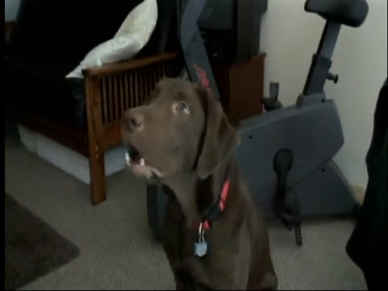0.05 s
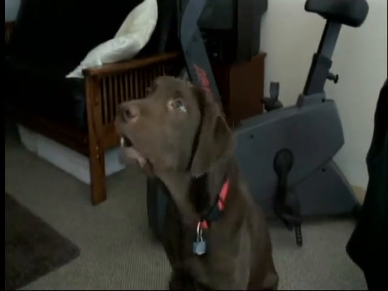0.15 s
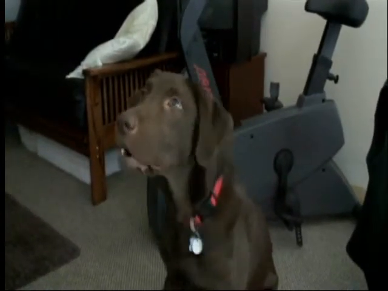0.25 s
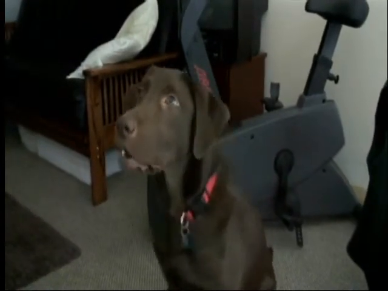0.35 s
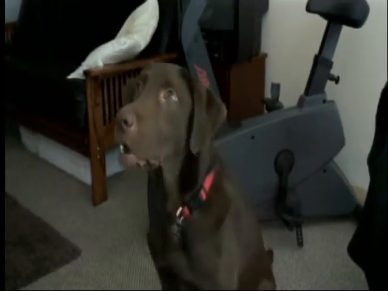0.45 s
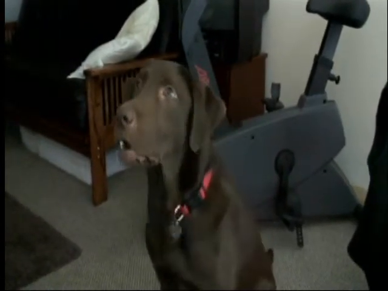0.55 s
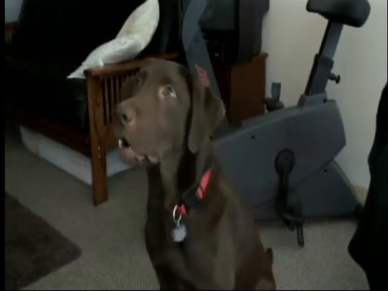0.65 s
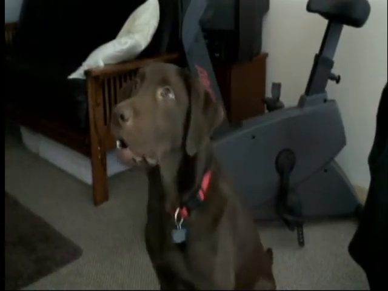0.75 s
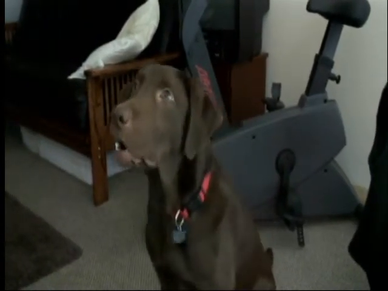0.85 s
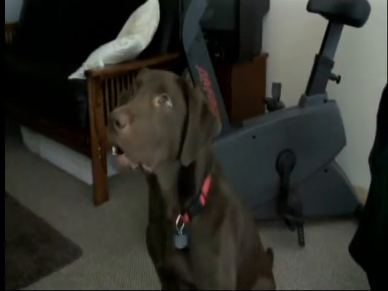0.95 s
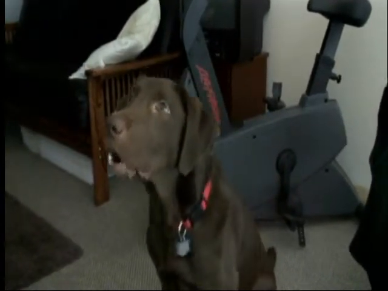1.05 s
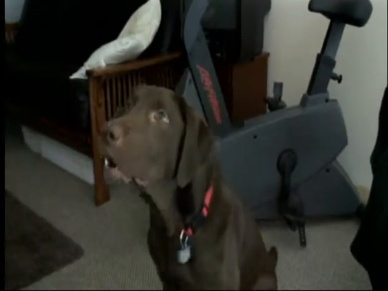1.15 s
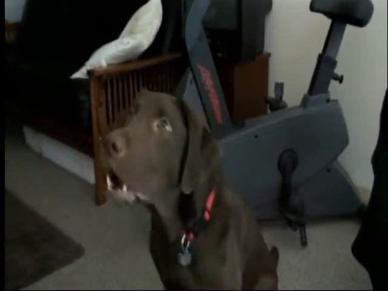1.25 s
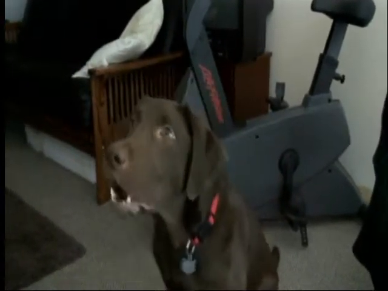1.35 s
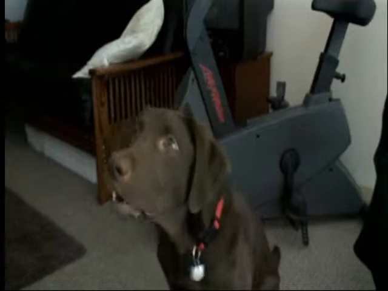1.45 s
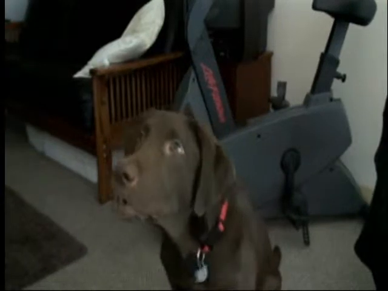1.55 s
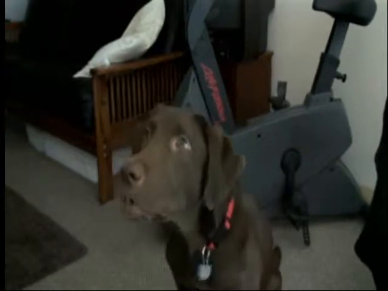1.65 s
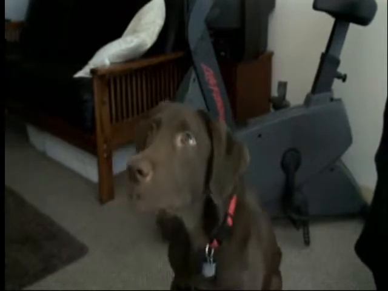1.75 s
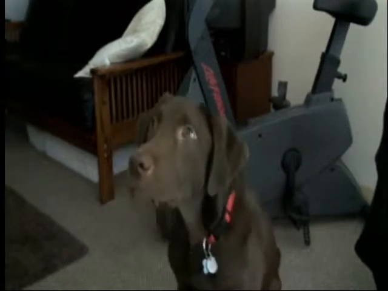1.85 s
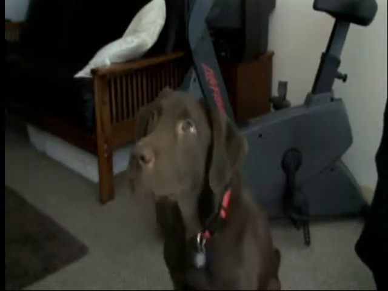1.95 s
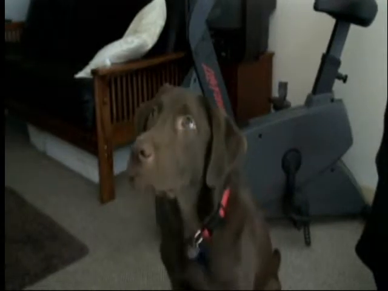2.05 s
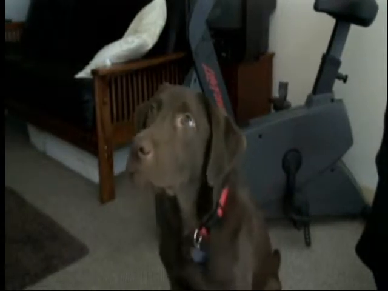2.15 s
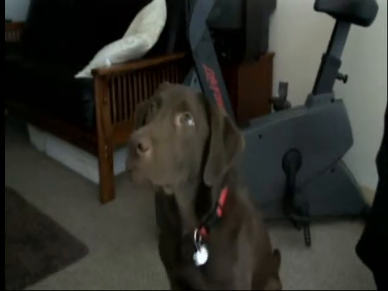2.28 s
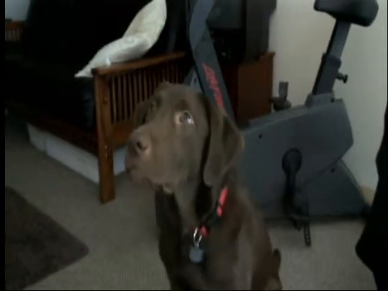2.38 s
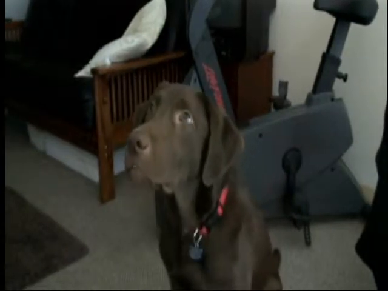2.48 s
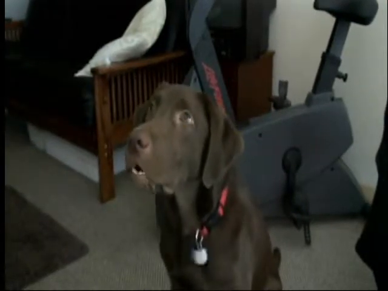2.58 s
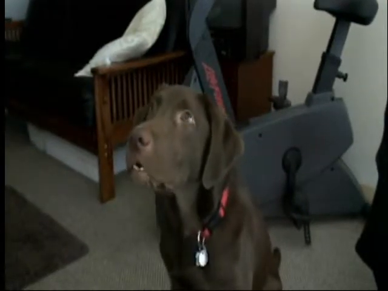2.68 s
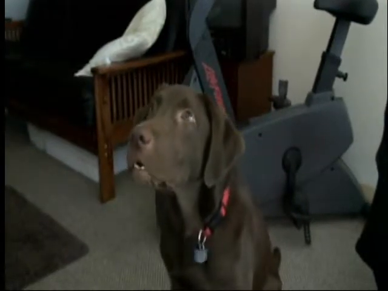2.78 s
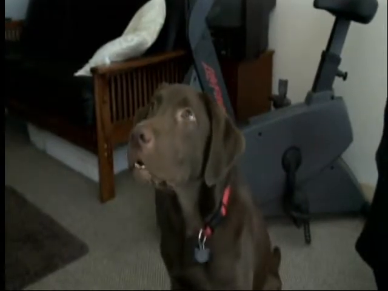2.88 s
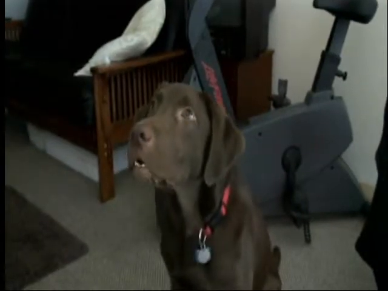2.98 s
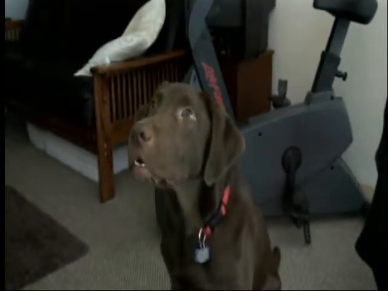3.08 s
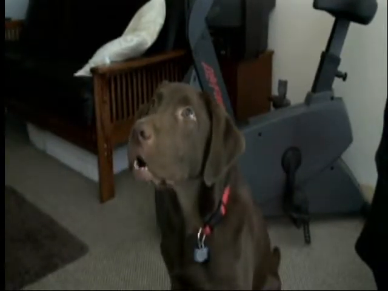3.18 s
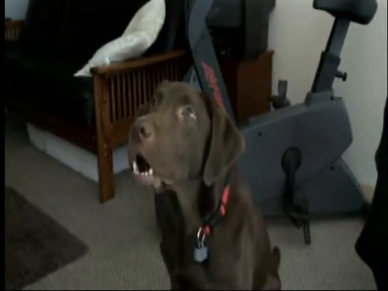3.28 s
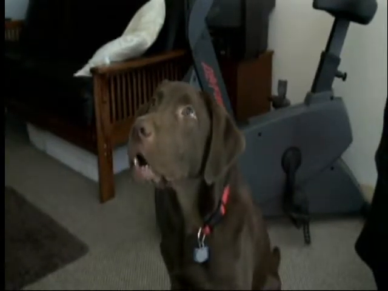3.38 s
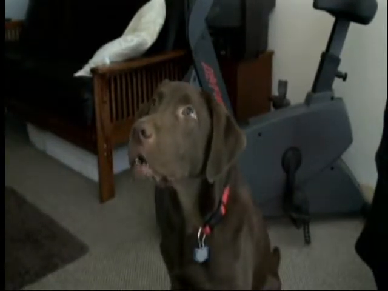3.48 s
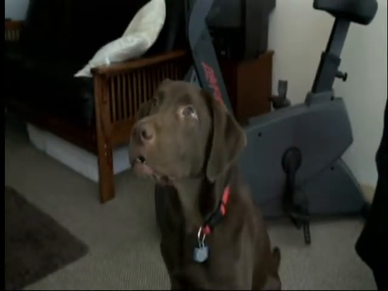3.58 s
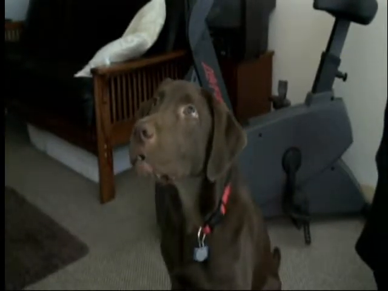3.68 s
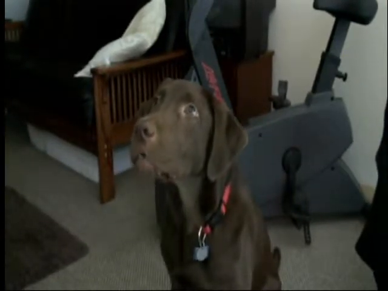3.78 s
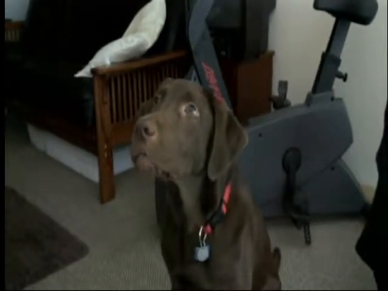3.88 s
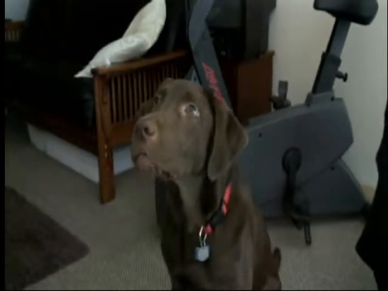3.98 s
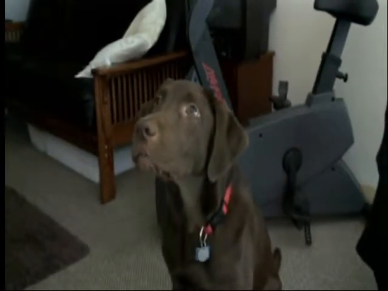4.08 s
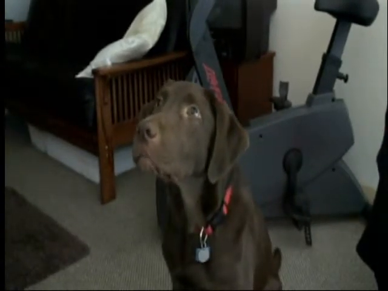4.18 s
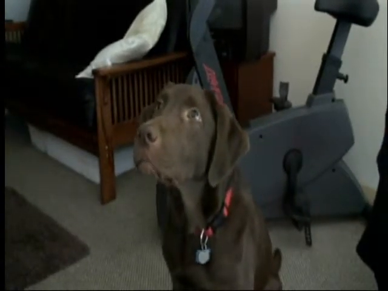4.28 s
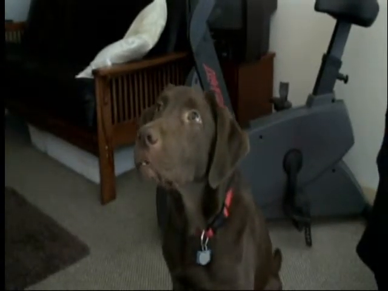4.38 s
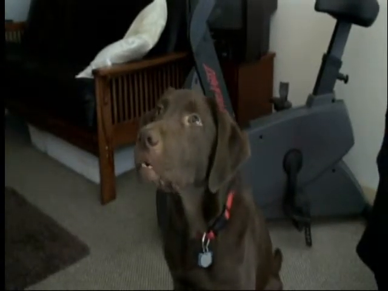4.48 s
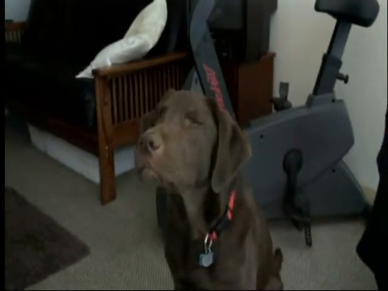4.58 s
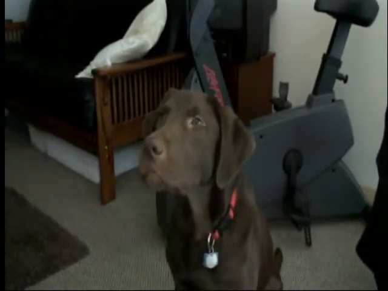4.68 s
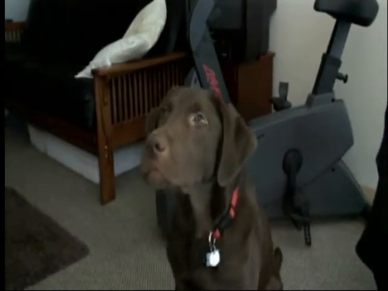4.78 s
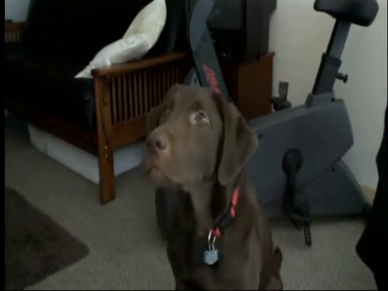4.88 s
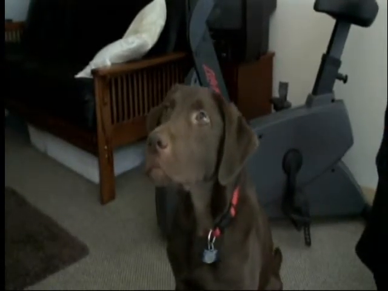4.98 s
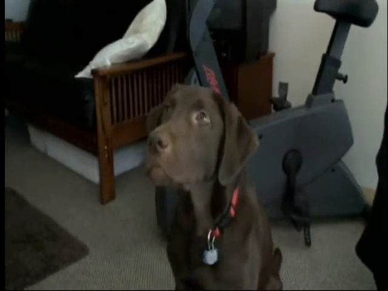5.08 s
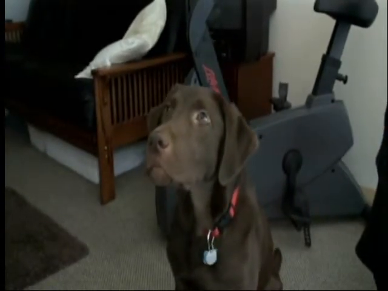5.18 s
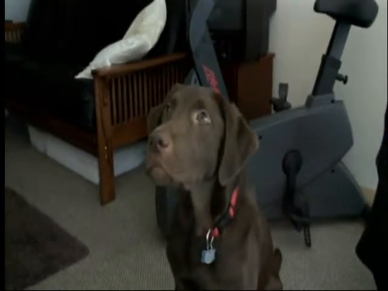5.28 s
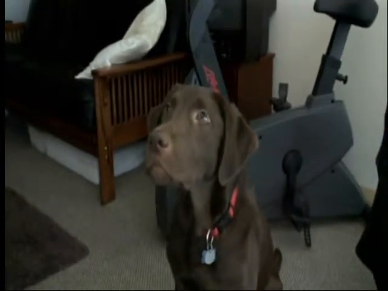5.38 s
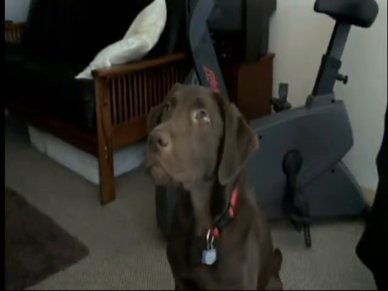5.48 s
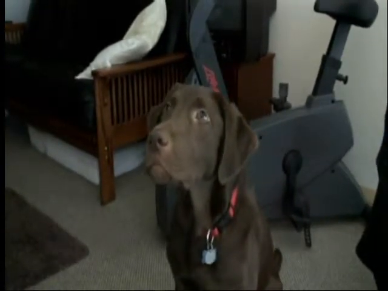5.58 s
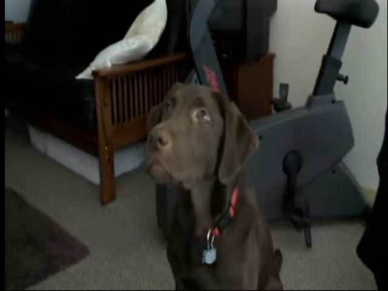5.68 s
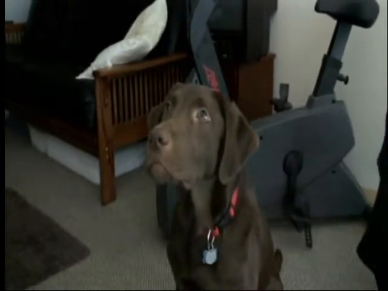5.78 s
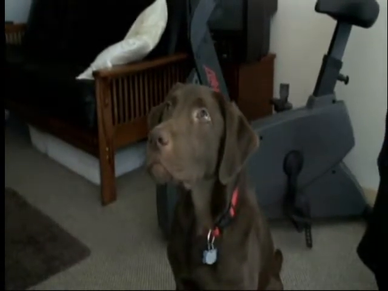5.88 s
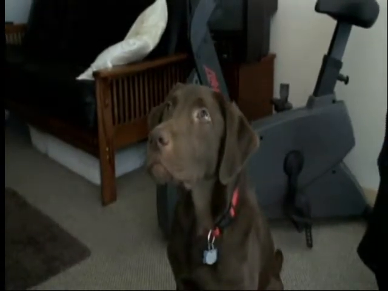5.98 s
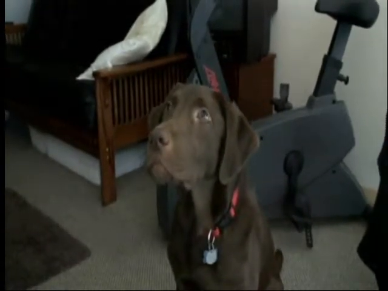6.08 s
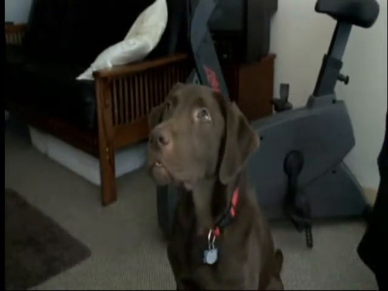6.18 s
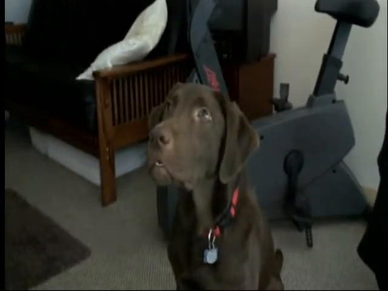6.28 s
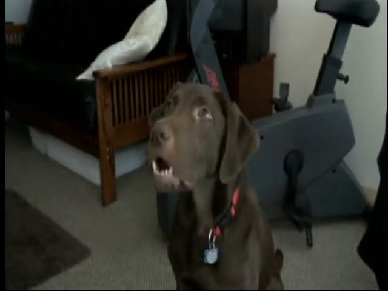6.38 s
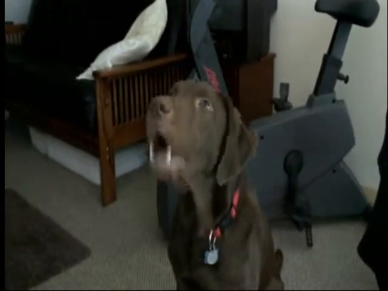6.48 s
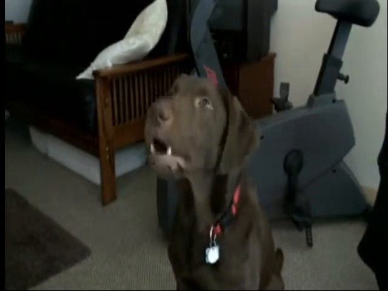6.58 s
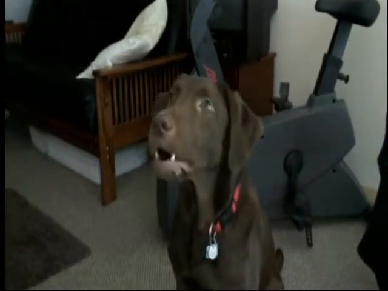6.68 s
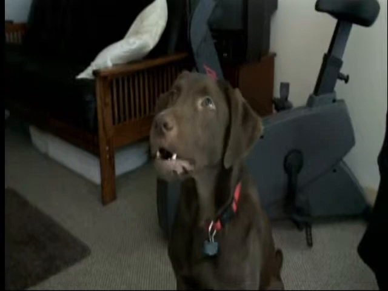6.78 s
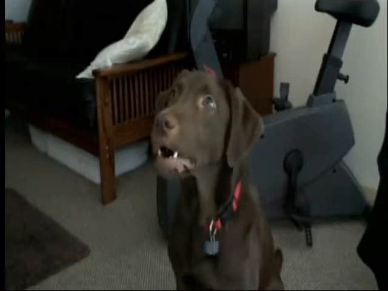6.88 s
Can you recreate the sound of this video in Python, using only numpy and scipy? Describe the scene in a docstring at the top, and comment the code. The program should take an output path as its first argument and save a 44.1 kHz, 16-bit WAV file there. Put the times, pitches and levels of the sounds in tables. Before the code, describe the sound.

Indoors and close by, a large dog whimpers in high nasal squeaks, its tags clinking, and lets out two sharp, high barks.

```python
"""A carpeted room, a small camera's microphone close in front of a large dog that sits and begs.
Over the room tone it huffs, its collar tags jingle, it smacks its lips and whistles thinly through
the nose. A yelping bark starts on a clean high note, then breaks and falls; the room rings after it.
More whistles and squeaks follow, with a soft low whine in short pushes. Last comes a second bark,
held down by the camera's gain control, and a yip as the jaw shuts."""
import sys
import numpy as np
from scipy import signal
from scipy.io import wavfile
from scipy.ndimage import uniform_filter1d

SR = 44100
rng = np.random.default_rng(int(sys.argv[2]) if len(sys.argv) > 2 else 0)


def store_wav(level_fs):
    """Save 16-bit WAV to argv[1]."""
    pcm = np.round(np.clip(np.atleast_2d(level_fs), -1, 1) * 32767)
    wavfile.write(sys.argv[1], SR, pcm.T.astype(np.int16))


N = 306054
TIME = np.arange(N) / SR

# room tone and hiss: (frequency [Hz], density [dB])
ROOM_TONE = [(20, 5.5), (45, -6), (150, -11), (290, -11.5), (480, -11.5), (620, -5), (780, -5),
             (1080, -15.5), (2050, -20), (4600, -25), (6200, -20.5), (7400, -17.5), (8300, -23),
             (11500, -23.5)]
# stereo image of the room tone: (frequency [Hz], left-right correlation [0-1])
STEREO_LIKENESS = [(30, 0.05), (130, 0.45), (300, 0.61), (700, 1), (2000, 0.48), (8000, 1), (12000, 0.88)]
# diffuse echo of the room: (frequency [Hz], level [dB], t60 [s])
ROOM_ECHO = [(250, -7.5, 0.13), (574, -9, 0.65), (1270, -6.5, 0.38), (2500, -5.5, 0.26), (4330, -8, 0.61),
             (9500, 5, 0.28)]
# standing waves between the walls: (frequency [Hz], level [dB], t60 [s])
ROOM_MODES = [(537, 4.5, 0.41), (716, 2.5, 0.72), (752, -9.5, 0.82), (872.7, 0.5, 0.87), (1505, -6.5, 0.53),
              (1747, 0, 0.4), (4200, 5, 0.45)]
# collar tags touching: (time [s], level [dB], brightness [dB/octave])
TAG_HITS = [(.538, -24.5, -13), (.553, -23.5, -7), (.678, -38, 0), (.761, -48, 18), (.765, -32, 11),
            (.835, -27.5, -2), (.858, -29, 10), (.883, -24, -10), (2.149, -36, 14), (2.484, -31, 22),
            (2.498, -54, 24), (2.658, -40, 4)]
# ring of their metal: (frequency [Hz], level [dB], t60 [s])
TAG_MODES = [(5722, -27, .05), (7375, -20, .05), (8428, -10, .17), (9140, -16, .07), (9178, -7, .095),
             (10240, -19, .07), (10480, -12, .09), (10720, -14, .05), (12500, -14, .08)]
# smacks of lips and jaw: (time [s], level [dB], brightness [dB/octave])
LIP_HITS = [(1.132, -43, 4.5), (1.312, -36, -0.5), (2.863, -34.5, 4.5), (3.679, -35.5, -0.5),
            (4.668, -50, 0), (6.614, -28, 4.5), (6.839, -17.5, 3.5)]
# ring of the jowls: (frequency [Hz], level [dB], t60 [s])
JOWL_MODES = [(618, 3, 0.019), (838, -2.5, 0.097), (1245, -2, 0.055), (1450, -10, 0.018),
              (1970, -17, 0.087), (4270, -11.5, 0.019), (7500, -16, 0.0065)]
# huffs through the lips: (peak time [s], level [dB])
HUFF_PEAKS = [(.291, -32.5), (1.611, -43.5)]
# air at the lips: (frequency [Hz], density [dB])
LIP_AIR = [(150, -59), (250, -26), (406, -18), (562, 6.5), (1160, -8.5), (1300, 0), (2160, -6.5),
           (3180, -11.5), (4920, -29), (6920, -16), (10400, -32), (12000, -95), (15600, -125),
           (22000, -120)]
# hisses in the nose: (start [s], length [s], level [dB], growth [dB], first ring [dB], last ring [dB])
NOSE_HISSES = [(0.351, 0.079, -44.5, -15, -11, -16), (0.435, 0.21, -50, -11, -12, -9),
               (1.779, .93, -51, -3.5, -16, 4), (2.925, 0.45, -60.5, 5, -10, -23),
               (3.54, .11, -51.5, 10, -11, -5), (4.739, 0.71, -61, 9.5, 2, 4.5), (5.32, 1, -58, -4, 4.5, 5)]
# colour of the nasal passage: (frequency [Hz], gain [dB])
NOSE_RESPONSE = [(2500, -11.5), (3150, -20), (3430, 5.5), (3800, -1), (4350, -1), (4750, -5), (5400, -4),
                 (6300, -8), (7200, 6), (8300, -14), (9700, -2.5), (10600, -37), (12000, -71)]
# high ring of narrowed nostrils: (frequency [Hz], density [dB])
NOSTRIL_RING = [(3600, -63), (4050, -13), (4330, -4), (4650, -9.5), (5100, -37), (9000, -37)]
# long whistles in the nose, one curve each: (time [s], pitch [Hz], level [dB])
WHISTLE_CURVES = [
    [(1.72, 4600, -88), (1.8, 5320, -51.5), (1.87, 5440, -68), (1.93, 5510, -43), (2.11, 4943, -51),
     (2.34, 4834, -59), (2.6, 4520, -66), (2.7, 4630, -53), (2.735, 5060, -56.5), (2.81, 5050, -75)],
    [(4.74, 4410, -62), (4.8, 4680, -52.5), (4.87, 4724, -52.5), (4.95, 4860, -62), (5.15, 5450, -65),
     (5.36, 5430, -59)],
    [(6.26, 5150, -59), (6.36, 5460, -61), (6.4, 5505, -53.5), (6.49, 5500, -51.5), (6.57, 5430, -77)],
]
# overtone of each long whistle, before the nose colours it: (level [dB])
WHISTLE_OVERTONES = [1, -17, -9]
# short whistled squeaks: (start [s], length [s], middle pitch [Hz], glide [Hz/s], level [dB])
NOSE_SQUEAKS = [(0.368, 0.076, 5120, -1000, -51.5), (0.454, .025, 5480, -4000, -56),
                (1.15, 0.025, 4720, 3000, -56.5), (1.232, 0.039, 4540, -9000, -55.5),
                (1.989, 0.18, 6300, 6000, -59), (3.241, 0.022, 3700, 2493, -52),
                (5.439, 0.116, 4590, -1500, -55), (5.54, 0.033, 4168, 2000, -41),
                (5.55, .125, 5250, -2600, -54), (5.645, .034, 4570, 5000, -41.5),
                (5.668, 0.087, 4270, -1000, -62), (5.828, 0.046, 4390, 5000, -42.5),
                (5.865, 0.048, 4520, -1000, -52.5), (6.03, 0.041, 4540, 0, -49),
                (6.09, 0.18, 4800, -900, -54), (6.193, 0.048, 4370, 5001, -41.5),
                (6.23, .06, 4640, 1500, -43.5)]
# pushes of the low whine: (start [s], length [s], middle pitch [Hz], glide [Hz/s], level [dB])
WHINE_PUSHES = [(5.342, 0.09, 626, -900, -44.5), (5.42, 0.14, 572.7, -250, -36.5),
                (5.658, 0.1, 529.4, -100, -41), (5.755, 0.096, 503, -100, -37.5),
                (5.858, .125, 502.8, 87, -37.5), (6.0, 0.11, 508.2, 3, -39.5), (6.22, 0.072, 565, 497, -47)]
# response of the closed mouth: (frequency [Hz], gain [dB])
CLOSED_MOUTH = [(500, -4), (620, 6.5), (1050, -14.5), (1250, -30.5), (1600, -39), (2080, -20.5),
                (2700, -68), (3500, -21.5), (3800, -46.5), (4150, -2.5), (4650, -15.5), (5500, -64)]
# two barks and the yip: (start [s], clean length [s], falling length [s], pitch [Hz], scoop [Hz],
# pitch after the break [Hz], sag [Hz/s], level [dB], onset punch [dB], break loss [dB], roughness [0-1])
YELPS = [(3.372, .096, 0.15, 743.1, 10.9, 705.6, 2049, -13, -7, 1, 0.06),
         (6.628, .099, 0.09, 853, 100, 605, 1510, -5, 3.5, 3, .12),
         (6.823, 0.012, 0.019, 808, 3.4, 790, 1590, -12.5, 9.5, 7, 0.18)]
# mouth response in each bark, the second with the jaw wider: (frequency [Hz], gain [dB])
OPEN_MOUTHS = [
    [(300, -44), (520, 2.5), (750, 2.5), (1000, -7.5), (1300, -2), (1520, -9.5), (1950, -12.5), (2250, -22),
     (3000, -29), (3750, -35.5), (4450, -27), (5300, -36), (7500, -28.5), (8400, -47.5), (10500, -47)],
    [(300, -10), (490, -14), (850, 3), (1150, 2.5), (1450, -7), (1720, -13), (2550, -20), (3450, -31),
     (4080, -26.5), (4300, -16), (4600, -30.5), (6000, -31), (7400, -24), (8600, -30.5), (10500, -68.5)],
]

CUTOFF_HZ = 12700   # top of the camera's range


def from_db(db):
    """Decibels to gain."""
    return 10 ** (np.asarray(db) / 20)


def rms_one(x):
    """Scale to unit power."""
    return x / np.sqrt(np.mean(x ** 2) + 1e-20)


def at_hz(points, hz, column=1):
    """Read a column of a spectrum on a log-frequency axis."""
    points = np.array(points)
    return np.interp(np.log(hz), np.log(points[:, 0]), points[:, column])


def during(start, length):
    """The samples that an event covers, and the time since its start."""
    span = np.flatnonzero((TIME >= start) & (TIME < start + length))
    return span, TIME[span] - start


def fades(t, attack_s, release_s):
    """Gain that rises, holds and falls to nothing at the end."""
    return np.clip(t / attack_s, 0, 1) * np.clip((t[-1] - t) / release_s, 0, 1)


def flutter(hz, size):
    """Random motion up to a given rate, spread about 1."""
    slow = signal.sosfilt(signal.butter(2, hz, fs=SR, output="sos"), rng.standard_normal(size + SR))
    return rms_one(slow)[SR:]


def cycles(pitch):
    """Running phase of an oscillator."""
    return 2 * np.pi * np.cumsum(pitch) / SR


def noise_bands(size, count=38):
    """Yield (centre [Hz], two unrelated noises) for narrow bands over the whole range."""
    edges = np.geomspace(18, 13000, count + 1)
    white = rng.standard_normal((2, 2, size))
    for k, (low, high) in enumerate(zip(edges, edges[1:])):
        band = signal.butter(2, [low, high], "band", fs=SR, output="sos")
        yield np.sqrt(low * high), signal.sosfilt(band, white[k % 2])


def room_tone(level_db=-50):
    """The steady bed of the room, widest in the bass."""
    out = 0
    for hz, (mid, side) in noise_bands(N):
        alike = at_hz(STEREO_LIKENESS, hz)
        stereo = np.sqrt(1 + alike) * mid + np.sqrt(1 - alike) * side * [[1], [-1]]
        out = out + from_db(at_hz(ROOM_TONE, hz)) * stereo
    return from_db(level_db) * rms_one(out)


def room_echo(x, first_echo_s=0.001):
    """Off the walls: diffuse echoes that die band by band, and a few standing waves that hang on."""
    t = TIME[:SR]
    tail = 0
    for hz, (noise, _) in noise_bands(SR):
        decay = from_db(-60 * t / at_hz(ROOM_ECHO, hz, column=2)) * (t > first_echo_s)
        tail = tail + from_db(at_hz(ROOM_ECHO, hz)) * noise * decay / np.linalg.norm(decay)
    for hz, db, t60 in ROOM_MODES:
        decay = from_db(-60 * t / t60)
        tail = tail + 2 * from_db(db) * np.cos(2 * np.pi * hz * t) * decay / decay.sum()
    return signal.fftconvolve(x, tail)[:N]


def ring(x, hz, t60):
    """A unit click sets a sine of height 1 ringing."""
    radius, angle = from_db(-60 / (t60 * SR)), 2 * np.pi * hz / SR
    return signal.lfilter([0, np.sin(angle)], [1, -2 * radius * np.cos(angle), radius ** 2], x + 1e-18)


def struck(hits, modes, spread_db, crack_db, crack_s, crack_hz):
    """Each contact gives a short crack and rings every mode, with its own level and brightness."""
    times, db, brightness = np.transpose(hits)
    onsets = np.round(times * SR).astype(int)
    octaves = np.log2(np.array(modes)[:, 0])
    tilt_db = np.outer(brightness, octaves - octaves.mean())
    chance_db = spread_db * rng.standard_normal(tilt_db.shape)
    strengths = from_db(db[:, None] + tilt_db + chance_db)
    out, clicks = np.zeros((2, N))
    for (hz, mode_db, t60), strength in zip(modes, strengths.T):
        clicks[onsets] = strength * from_db(mode_db) * rng.choice([-1, 1], len(onsets))
        out += ring(clicks, hz, t60)
    clicks[onsets] = from_db(db + crack_db)
    decay = signal.lfilter([1], [1, -np.exp(-1 / (crack_s * SR))], clicks + 1e-18)
    crack = decay * rng.standard_normal(N)
    return out + signal.sosfilt(signal.butter(3, crack_hz, "band", fs=SR, output="sos"), crack)


def collar_tags():
    """Metal tags knock together and ring high."""
    return struck(TAG_HITS, TAG_MODES, spread_db=1.5, crack_db=-4, crack_s=0.003, crack_hz=[6500, 12000])


def lip_smacks():
    """Lips and jaw smack, and the jowls ring briefly."""
    return struck(LIP_HITS, JOWL_MODES, spread_db=0, crack_db=2.5, crack_s=0.00099, crack_hz=[500, 3000])


def air(spectrum, size):
    """Turbulence coloured by a passage, rms 1."""
    hz = np.linspace(0, SR / 2, 513)
    bass_cut = np.minimum(hz / spectrum[0][0], 1) ** 2
    passage = signal.firwin2(len(hz), hz, from_db(at_hz(spectrum, hz + 1)) * bass_cut, fs=SR)
    return rms_one(signal.fftconvolve(rng.standard_normal(size), passage, "same"))


def huffs(rise_db_per_s=295, fall_db_per_s=388):
    """Puffs of air swell and die at the lips."""
    puffs = sum(from_db(db - np.maximum(rise_db_per_s * (peak - TIME), fall_db_per_s * (TIME - peak)))
                for peak, db in HUFF_PEAKS)
    return puffs * air(LIP_AIR, N)


def nose_hiss(waver_db=2.27):
    """Air hisses in the nose, ringing as the nostrils narrow."""
    out = np.zeros(N)
    for start, length, db, growth_db, first_ring_db, last_ring_db in NOSE_HISSES:
        span, t = during(start, length)
        ring_gain = from_db(np.linspace(first_ring_db, last_ring_db, len(span)))
        hiss = air(NOSE_RESPONSE, len(span)) + ring_gain * air(NOSTRIL_RING, len(span))
        level_db = db + growth_db * (t / length - 0.5) + waver_db * flutter(31, len(span))
        out[span] += hiss * from_db(level_db) * fades(t, attack_s=0.072, release_s=0.042)
    return out


def push(start, length, hz, glide, swell_power=0.76):
    """One short effort: its samples, its gliding pitch and its swell from 0 to 1 and back."""
    span, t = during(start, length)
    return span, hz + glide * (t - length / 2), np.abs(np.sin(np.pi * t / length)) ** swell_power


def thin_tone(pitch, overtone_db, jitter, waver_db=2.0, overtone_waver_db=6.0):
    """A thin wavering tone with a broken overtone that the nose colours."""
    size = len(pitch)
    phase = cycles(pitch * (1 + jitter * flutter(93, size)))
    coloured_db = overtone_db + at_hz(NOSE_RESPONSE, 2 * pitch) + overtone_waver_db * flutter(60, size)
    overtone = from_db(coloured_db) * np.sin(2 * phase + flutter(170, size))
    return np.sqrt(2) * from_db(waver_db * flutter(32, size)) * (np.sin(phase) + overtone)


def nose_whistles(fold_swing, fade_s=0.0087):
    """Long whistles and short squeaks; the vibrating folds chop them and give them sidebands."""
    out = np.zeros(N)
    for curve, overtone_db in zip(WHISTLE_CURVES, WHISTLE_OVERTONES):
        times, hz, db = np.transpose(curve)
        span = np.flatnonzero((TIME >= times[0]) & (TIME <= times[-1]))
        pitch = np.interp(TIME[span], times, hz)
        gain = from_db(np.interp(TIME[span], times, db)) * fades(TIME[:len(span)], fade_s, fade_s)
        out[span] += gain * thin_tone(pitch, overtone_db, jitter=0.0042)
    for *course, db in NOSE_SQUEAKS:
        span, pitch, effort = push(*course)
        out[span] += from_db(db) * effort * thin_tone(pitch, overtone_db=-20, jitter=0.0069)
    return out * (1 + 0.5 * fold_swing)


def voiced(pitch, phase, tract, dull_db=0, count=16):
    """Harmonics of the vocal folds, weighted by the tract; each step up loses a further dull_db."""
    out = 0
    for k in range(1, count + 1):
        gain = from_db(at_hz(tract, k * pitch) - dull_db * (k - 0.5))
        out = out + gain * np.cos(k * phase) * (k * pitch < CUTOFF_HZ)
    return np.sqrt(2) * out


def whine(jitter=0.0051, weak_pitch_rise=0.0539):
    """The soft low voice, settling lower as each push swells. Gives the sound and the folds' swing."""
    out, fold_swing = np.zeros((2, N))
    for *course, db in WHINE_PUSHES:
        span, pitch, effort = push(*course)
        phase = cycles(pitch * (1 + weak_pitch_rise * (1 - effort) + jitter * flutter(52, len(span))))
        out[span] += from_db(db) * effort * voiced(pitch, phase, CLOSED_MOUTH, count=10)
        fold_swing[span] += np.sqrt(effort) * np.cos(phase)
    return out, fold_swing


def yelp(start, clean_s, fall_s, hz, scoop_hz, broken_hz, sag, db, punch_db, loss_db, hoarse):
    """Course of a bark: a clean note dips, creeps up and cracks, then sags as the pressure runs out."""
    scoop_s, punch_s, break_s = 0.014, 0.015, 0.02265
    climb_hz_per_s, fade_db_per_s = 152.6, 100.5
    break_roughness, roughen_per_s = 0.21, 4.4
    span, t = during(start, clean_s + fall_s)
    since_break = np.maximum(t - clean_s, 0)
    broken = (1 - np.cos(np.pi * np.minimum(since_break / break_s, 1))) / 2
    scoop = (t / scoop_s * np.exp(1 - t / scoop_s)) ** 2
    clean_pitch = hz - scoop_hz * scoop + climb_hz_per_s * t
    pitch = (1 - broken) * clean_pitch + broken * (broken_hz - sag * since_break)
    level_db = db + punch_db * np.exp(-t / punch_s) - loss_db * broken - fade_db_per_s * since_break
    gain = from_db(level_db) * fades(t, attack_s=0.0043, release_s=0.025)
    rough = np.clip(hoarse + break_roughness * broken + roughen_per_s * since_break, 0, 1)
    return span, pitch, gain, rough


def bark(course, mouth, jitter=0.11, shimmer=0.1, flutter_hz=200, rasp_db=-7, breath_db=-21,
         blur_db=5.5, onset_dull_db=10, brighten_s=0.0099, low_cut_hz=380):
    """A clean yelp; as the pressure falls the folds beat unevenly and let rasping air through."""
    span, pitch, gain, rough = yelp(*course)
    size = len(span)
    phase = cycles(pitch * (1 + jitter * rough * flutter(flutter_hz, size)))
    # high harmonics are weak when the beats are uneven and while the folds get going
    dull_db = blur_db * rough + onset_dull_db * np.exp(-TIME[:size] / brighten_s)
    tone = voiced(pitch, phase, mouth, dull_db) * (1 + shimmer * rough * flutter(flutter_hz, size))
    rasp = from_db(rasp_db) * rough * air(mouth, size)
    spurts = (1 + np.cos(phase)) / 2   # one spurt of air per beat
    breath = from_db(breath_db) * rough * air(NOSE_RESPONSE, size) * spurts
    out = np.zeros(N)
    out[span] = gain * (tone + rasp + breath)
    return signal.sosfilt(signal.butter(5, low_cut_hz, "high", fs=SR, output="sos"), out)


def scene(tag_echo_db=-7):
    """The dog close up, dead centre; its chest keeps part of the tags' sound from the walls."""
    low_voice, fold_swing = whine()
    barks = bark(YELPS[0], OPEN_MOUTHS[0]) + sum(bark(course, OPEN_MOUTHS[1]) for course in YELPS[1:])
    tags = collar_tags()
    smacks = lip_smacks()
    dog = barks + low_voice + nose_whistles(fold_swing) + huffs() + nose_hiss() + smacks
    return dog + tags + room_echo(dog + from_db(tag_echo_db) * tags) + room_tone()


def record(dry, ceiling_db=-11.5, release_db_per_s=60, window_s=0.006, mic_top_hz=11000):
    """The microphone dulls the top; gain control ducks quickly above the ceiling and recovers slowly."""
    heard = signal.sosfilt(signal.butter(12, mic_top_hz, fs=SR, output="sos"), dry)
    window = int(window_s * SR)
    power = uniform_filter1d(heard.mean(axis=0) ** 2, window)
    excess_db = np.maximum(10 * np.log10(np.abs(power) + 1e-12) - ceiling_db, 0)
    recovery_db = release_db_per_s * TIME
    held_db = np.maximum.accumulate(excess_db + recovery_db) - recovery_db
    ducked = heard * from_db(-uniform_filter1d(held_db, window))
    return signal.sosfilt(signal.ellip(10, 0.1, 80, CUTOFF_HZ, fs=SR, output="sos"), ducked)


dry = scene()
out = record(dry)
store_wav(out)
```